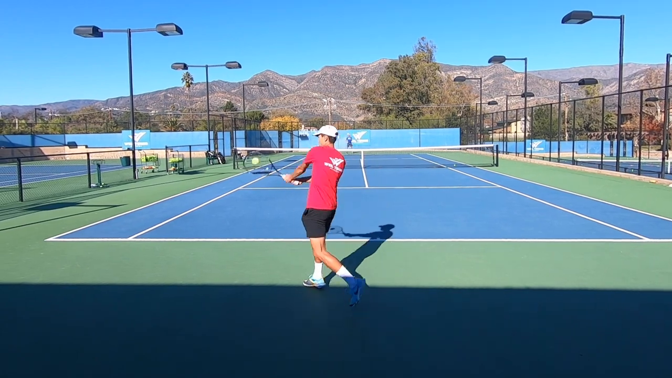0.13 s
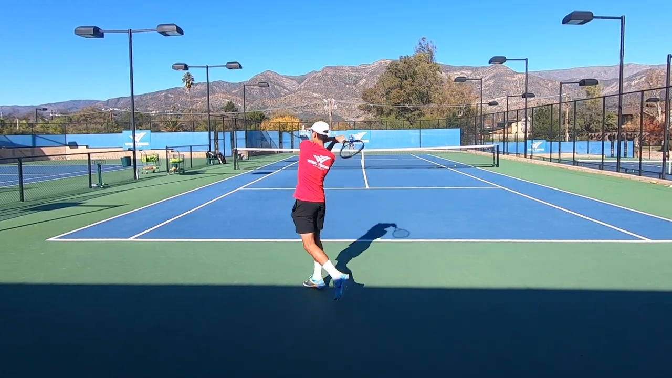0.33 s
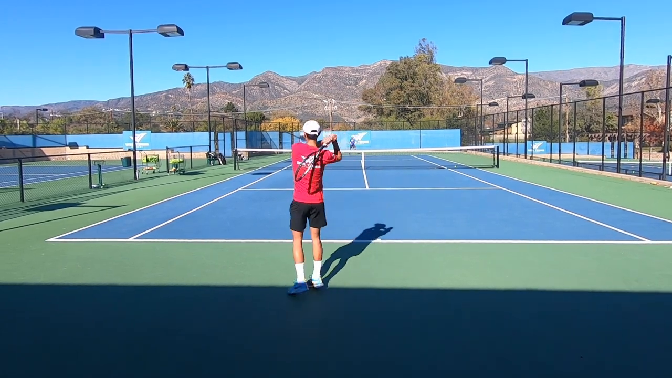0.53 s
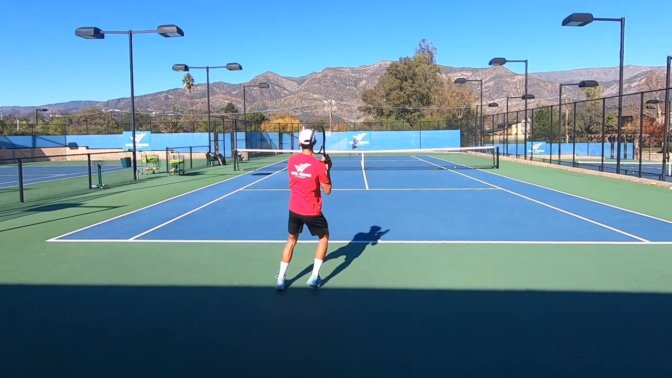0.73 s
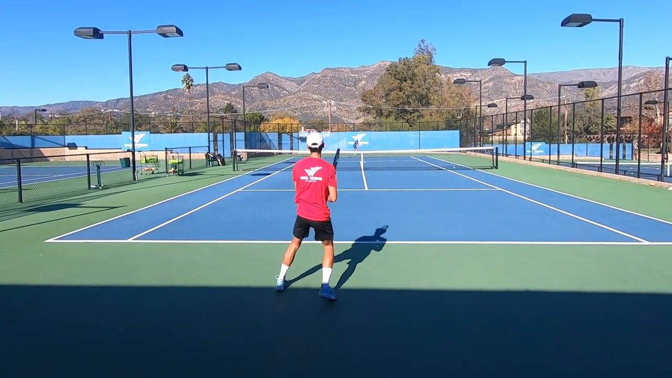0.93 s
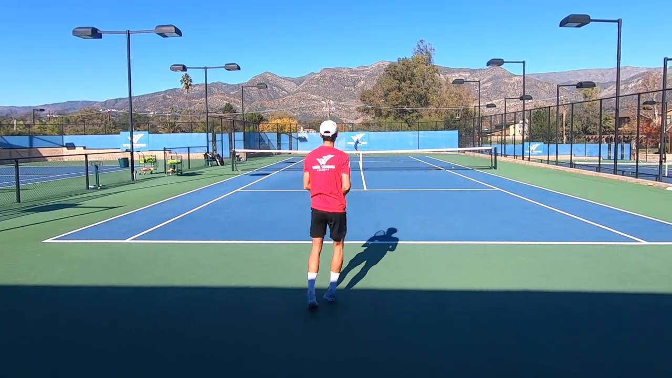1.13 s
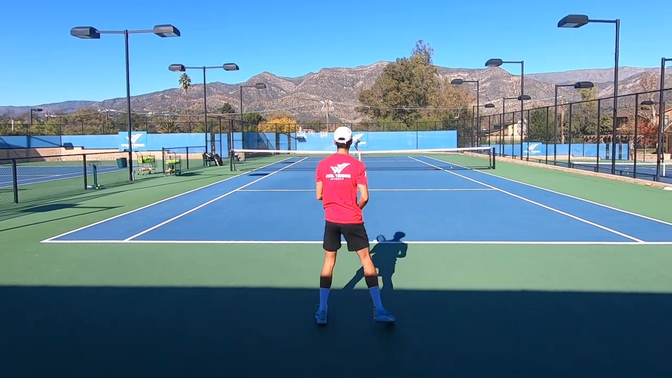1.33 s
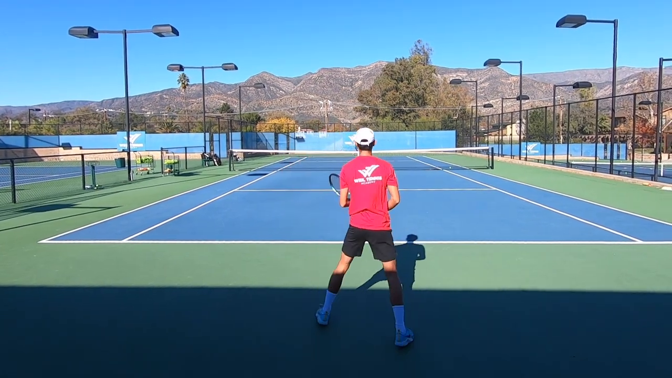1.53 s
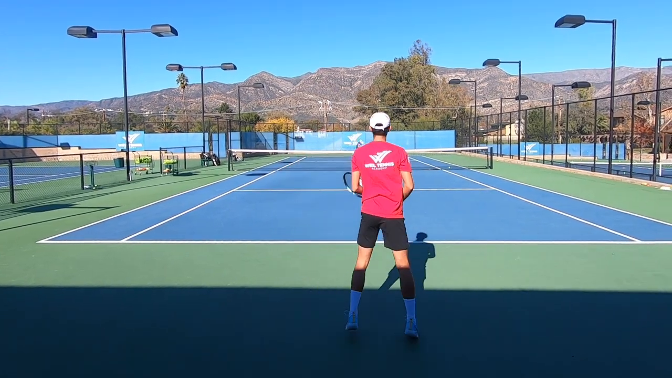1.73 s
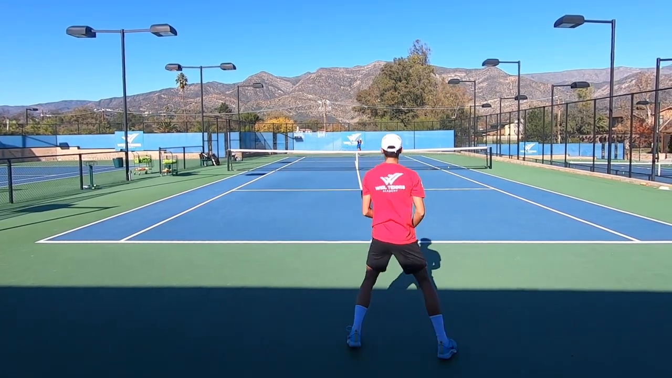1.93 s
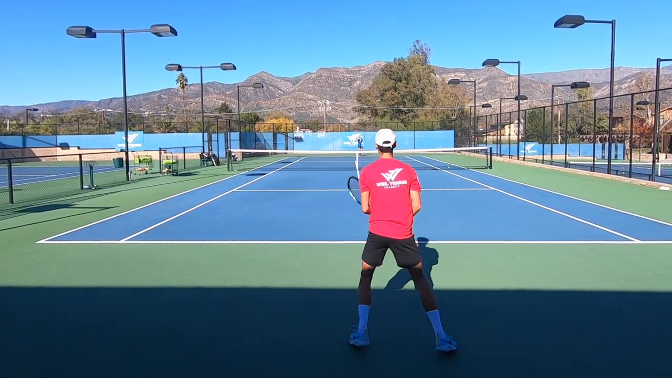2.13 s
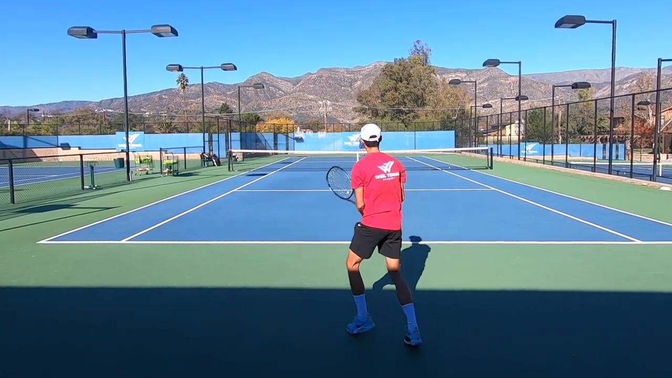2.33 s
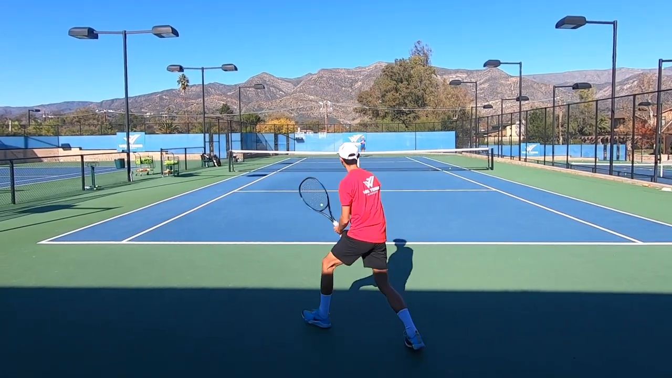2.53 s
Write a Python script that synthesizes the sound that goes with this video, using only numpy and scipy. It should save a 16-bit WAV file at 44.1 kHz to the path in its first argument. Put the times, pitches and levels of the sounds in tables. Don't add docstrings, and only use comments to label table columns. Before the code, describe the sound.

Tennis racket hits: a loud close pop, shoe scuffs, a distant answering pop, a near ball bounce

```python
import sys
import numpy as np
from scipy import signal
from scipy.fft import rfft, irfft, next_fast_len
from scipy.io import wavfile
from scipy.ndimage import uniform_filter1d

SR = 44100
rng = np.random.default_rng(int(sys.argv[2]) if len(sys.argv) > 2 else 0)


def file_out(sig):
    cols = np.atleast_2d(sig).T
    lim = np.clip(cols, -1, 1)
    pcm = np.round(lim * 32767).astype(np.int16)
    wavfile.write(sys.argv[1], SR, pcm)


def boost_factor(decibels):
    exponent = np.asarray(decibels, float) / 20
    return 10 ** exponent


N = 114660

# [t/s, first line level/dB, second line level/dB]
HUM_SWELL = [(0, -42, -44.5), (.12, -45, -49.5), (.3, -51, -62), (.6, -50.5, -51.5), (.87, -46, -61),
             (1.05, -58, -51), (1.3, -52.5, -58.5), (1.45, -42.5, -54.5), (1.72, -41.5, -53),
             (1.899, -46, -48.5), (2.08, -57.5, -63.5), (2.3, -41, -49), (2.6, -48.5, -53.5)]
# [f/Hz, density/dB]
TOWN_SPECTRUM = [(25, 5), (50, 0), (100, -6), (300, -17), (500, -25), (1500, -24), (4000, -42),
                 (13000, -73)]
# [t/s, level/dB]
TRAFFIC_SWELL = [
    (0, 2.5),
    (.5, 1.5),
    (.85, -2),
    (1.15, 0.5),
    (1.45, -0.5),
    (1.75, -1),
    (2.1, 1),
    (2.6, 0.5),
]
# [f/Hz, share/0-1]
TOWN_LIKENESS = [(60, 0.77), (300, 0.93), (640, 0.6), (1400, 0), (8000, 0.9)]
# [t/s, level/dB, pan/dB, t60/s, centre f/Hz]
BRIGHT_CRACKS = [(.2268, -29, 4.5, 0.041, 3900), (.2262, -27, -2.5, 0.025, 7600), (0.2, -38, 1, 0.022, 14500),
                 (.2265, -29, 0, 0.042, 2960), (.3716, -53, -1, 0.024, 7100), (.4120, -55, 18, 0.065, 1300),
                 (.4230, -32.5, 6, 0.11, 970), (0.78, -57.5, -5, 0.045, 2700), (0.29, -54.5, 2, 0.026, 2900),
                 (0.017, -45.5, -1, 0.024, 1470), (1.3, -41, -7, 0.022, 1020), (1.8565, -54, 1, 0.02, 5700),
                 (1.8595, -40.5, -3, 0.025, 2700), (2.4, -41, 0, 0.09, 980), (1.8590, -35, -3, 0.018, 2400),
                 (1.8645, -33, 1, .015, 2000), (1.8985, -44, -2, 0.018, 2600), (1.9035, -41, -1, .015, 1950),
                 (1.8740, -49.5, -5, 0.13, 2900), (1.9515, -43.5, -2, 0.061, 3250),
                 (2.5950, -43.5, -8, 0.046, 2320)]
# [t/s, level/dB, pan/dB, contact/ms]
BALL_BOUNCES = [
    (.022, -31.5, -6, 0.9),
    (2.5950, -14.5, -17, 2.26),
]
# [f/Hz, level/dB, t60/s]
BALL_MODES = [(254, -4.5, 0.067), (430, -2, 0.02), (779, 5, 0.024), (1260, 4, 0.022)]
# [t/s, level/dB, pan/dB, t60/s, centre f/Hz]
GRIT_TICKS = [(.0423, -62.5, -1.5, 0.025, 7040), (.0667, -61, -3, 0.014, 6000),
              (.158, -59, -0.5, .02, 7000), (.5906, -66, -4, 0.018, 6000), (.621, -62, -6, 0.018, 6500),
              (.753, -58, -4, .015, 5500), (1.1892, -45, -2, .01, 5800), (1.212, -43, -4, 0.0092, 6200),
              (1.2795, -42, -7, .012, 6100), (1.7823, -61, -3, .02, 7000), (1.8043, -61.5, -3, 0.025, 7500),
              (2.178, -70, -7, .02, 7000), (2.200, -63, -2, .02, 6500), (2.2388, -62.5, -3, 0.032, 7000),
              (2.2677, -59, -1, .03, 7050), (2.282, -62, -2, 0.022, 8000), (2.300, -64, -2.5, .02, 8000),
              (2.412, -68, -4, .015, 8000), (2.4259, -61, -3.5, 0.018, 8000),
              (2.4409, -55, -4, 0.022, 6840)]
# [start t/s, swell/s, release/s, level/dB, centre f/Hz]
SWISH_EVENTS = [
    (.100, 0.036, 0.023, -59.5, 3960),
    (.170, 0.067, .005, -43.5, 4340),
    (.560, .13, .01, -60.5, 6000),
    (.6, .09, .01, -58.5, 2800),
    (2.150, 0.12, 0.058, -61.5, 4400),
    (.105, 0.034, 0.038, -61.5, 7500),
    (2.17, 0.088, 0.076, -67.5, 8000),
]
# [start t/s, length/s, from f/Hz, to f/Hz, level/dB]
STRING_WHISTLES = [
    (0.188, .022, 7600, 8700, -58),
    (0.196, .03, 4500, 5800, -58),
]
# [start t/s, hold/s, release/s, level/dB, centre f/Hz]
SCUFF_EVENTS = [(.705, .035, .015, -58, 9700), (.952, 0.012, 0.016, -68, 8400), (1.19, .03, .02, -65, 9500),
                (1.255, .038, 0.0098, -52, 9500), (1.488, 0.028, 0.027, -53, 8200),
                (2.35, 0.02, .01, -64, 8800), (0.247, 0.088, 0.053, -60.5, 4260),
                (.692, 0.044, 0.011, -43.5, 6000), (.697, 0.02, 0.052, -44, 2800),
                (0.731, 0.049, 0.099, -65, 5500), (0.953, 0.0096, 0.017, -51, 6000),
                (1.084, 0.0013, 0.0081, -52, 4700), (1.183, 0.04, 0.022, -52.5, 5630),
                (1.186, 0.072, 0.024, -53.5, 700), (1.185, .105, 0.017, -58.5, 2100),
                (1.487, 0.043, 0.049, -56, 1730), (.953, 0.012, .015, -57.5, 2500),
                (.214, 0.013, .004, -38.5, 605), (1.236, 0.041, .01, -51, 6000),
                (1.285, 0.0059, 0.0099, -47.5, 4100), (1.307, 0.095, 0.091, -70, 3960),
                (1.484, 0.023, 0.051, -57, 4200), (2.352, 0.0091, .006, -57, 4940),
                (2.367, 0.0068, 0.013, -45.5, 4150)]
# [t/s, level/dB, pan/dB, contact/ms]
NEAR_POPS = [(.2262, -18, 0, 0.63), (.2278, -9, -5, 0.68), (.2315, -23, -7, 0.27), (.280, -48, -12, 1),
             (.373, -31.5, 10, 0.67), (.377, -41, 2, .4), (.4140, -40, 6, 0.61), (.4245, -42, 0, 0.38),
             (.4262, -35, 5.5, 0.36), (.4315, -40.5, -5, 0.33), (.440, -41.5, 2, 0.37)]
# [f/Hz, level/dB, t60/s]
NEAR_MODES = [(91.4, -11, 0.059), (303, 10.5, 0.017), (520, -2.5, 0.023), (755, 4, 0.031), (1065, 3, 0.03),
              (1481, -1, 0.047), (1745, -6.5, .02), (2014, -5, 0.038), (2506, 0, 0.023), (2880, -3.5, 0.02),
              (3215, -9.5, .02), (3860, -14.5, .02)]
# [centre f/Hz, width/Hz, near pop level/dB, far pop level/dB, t60/s]
TAIL_BANDS = [(283, 420, -44, -46.5, 0.81), (566, 230, -51.5, -59.5, 1.4), (836, 260, -48, -46.5, 1.44),
              (1055, 240, -47, -37.5, 1.26), (1576, 340, -44.5, -49.5, 0.7), (2800, 1500, -55.5, -57, 0.84),
              (7500, 5500, -64, -68, 0.62)]
# [t/s, level/dB, pan/dB, contact/ms]
STEP_LANDINGS = [
    (.6910, -33.5, -9, 0.57),
    (1.0845, -30.5, -6.5, 0.4),
    (1.4850, -28, -11, 0.89),
    (2.4780, -38, 5, 0.54),
]
# [f/Hz, level/dB, t60/s]
SOLE_MODES = [(218, -8, 0.056), (633, -10, 0.014), (964, -5.5, 0.015), (1365, -8, 0.021),
              (2050, -3, 0.0081)]
# [t/s, level/dB, pan/dB, contact/ms]
FAR_POPS = [
    (1.8563, -41, 9, 0.57),
    (1.8575, -12.5, -2.5, 0.33),
    (1.8634, -18, -12.5, 0.38),
    (1.8749, -23.5, -12, 0.66),
    (1.8850, -31.5, -30, 0.17),
    (1.8940, -20.5, 1, 0.87),
    (1.904, -33, 7, 0.2),
    (1.9570, -24, 18.5, 0.3),
    (1.9593, -19, 2, 0.59),
    (2.089, -37.5, -6, 0.48),
]
# [f/Hz, level/dB, t60/s]
FAR_MODES = [(211, -8, 0.039), (390, -9, 0.024), (551, -13.5, 0.055), (783, -6.5, 0.037), (906, -4, 0.026),
             (1112, 6, 0.019), (1273, -11, 0.066), (1970, -12, 0.013), (2500, -13.5, 0.014),
             (3180, -47, .01)]

HUM_HZ, HUM2_HZ, HUM_WANDER, HUM_FLICKER_DB = 59.8, 118.1, .025, 1.8
TOWN_DB, TOWN_DRIFT_DB = -46, .9
RISE_S, MODE_VARY_DB, MODE_DETUNE = 0.0006, 1.5, .012
SCUFF_ATTACK_S, SCUFF_PAN_DB, SCUFF_TRIM_DB, CATCH_DB = 0.00067, -4, -4, 2.2
GRIT_PER_S, GRIT_SPREAD_DB, GRIT_WIDTH = 6600, 1.5, .6
GRIT_AIR_DB, GRIT_AIR_HZ, AIR_PAN_DB = -15, 11040, -0.5
TAIL_RISE_S, TAIL_LUMP_DB = 0.0018, 1.9
PORT_HZ, PORT_LAG_S = 500, 2e-5
MIC_LOW_HZ, MIC_TOP_HZ, TOP_HZ, HEADROOM = 72.6, 11700, 15800, .75
PRESENCE_HZ, PRESENCE_WIDTH_HZ, PRESENCE_DB = 6000, 420, -18


def unit(x):
    return x / np.sqrt(np.mean(x ** 2))


def band(x, hz, width):
    return signal.lfilter(*signal.iirpeak(hz, max(hz / width, .2), fs=SR), x)


def walk(rate, count):
    k = int(SR / rate)
    held = np.repeat(rng.standard_normal(N // 50), k)[:count]
    return 1.85 * uniform_filter1d(uniform_filter1d(held, k), k)


def add(out, at_s, sound, pan_db):
    size = next_fast_len(len(sound) + 64)
    hz = np.arange(size // 2 + 1) * SR / size
    start = int(at_s * SR)
    half = np.array([[.5], [-.5]]) * pan_db
    late = (at_s * SR - start + 8) / SR + half / 2 * PORT_LAG_S
    level = boost_factor(half * hz ** 2 / (hz ** 2 + PORT_HZ ** 2))
    pair = irfft(rfft(sound, size) * level * np.exp(-2j * np.pi * hz * late), size)
    out[:, start - 8:start - 8 + size] += pair[:, :N - start + 8]


def hum():
    times, first_db, second_db = np.array(HUM_SWELL).T
    out, t = 0, np.arange(N) / SR
    for hz, db in ((HUM_HZ, first_db), (HUM2_HZ, second_db)):
        level = boost_factor(np.interp(t, times, db) + HUM_FLICKER_DB * walk(18, count=N))
        pitch = hz * (1 + HUM_WANDER * walk(11.0, count=N))
        out = out + np.sqrt(2) * level * np.sin(2 * np.pi * np.cumsum(pitch) / SR)
    return out


def town():
    out, f = 0, np.arange(N // 2 + 1) * SR / N + 1
    swell = np.interp(np.arange(N) / SR, *np.array(TRAFFIC_SWELL).T)
    floor_hz, floor_db = np.array(TOWN_SPECTRUM).T
    alike_hz, alike = np.array(TOWN_LIKENESS).T
    spectrum = boost_factor(np.interp(np.log(f), np.log(floor_hz), floor_db))
    for hz in 22 * 2 ** np.arange(0, 9.6, .5):
        bell = np.exp(-(np.log2(f / hz) * 3) ** 2) * spectrum
        mid, side = irfft(rfft(rng.standard_normal((2, N))) * bell, N)
        share = np.clip(np.interp(np.log(hz), np.log(alike_hz), alike), 0, 1)
        drift = TOWN_DRIFT_DB * walk(2.9, count=N) + 0.41 * walk(44, count=N)
        level = boost_factor(drift + swell * min(hz / 300., 1))
        pair = np.sqrt(1 + share) * mid + np.sqrt(1 - share) * side * np.array([[1], [-1]])
        out = out + level * pair
    return boost_factor(TOWN_DB) * unit(out)


def cracks(rows):
    out, t = np.zeros((2, N)), np.arange(SR // 8) / SR
    for at, db, pan, t60, hz in rows:
        burst = unit(band(band(rng.standard_normal(len(t)), hz, 0.33 * hz), hz, 1.47 * hz))
        fade = np.minimum(t / 0.0011, 1) * 1000. ** (-t / t60)
        add(out, at, boost_factor(db) * burst * fade, pan)
    return out


def blows(rows, modes):
    out, t = np.zeros((2, N)), np.arange(SR // 8) / SR
    chance = rng.standard_normal((len(rows), 2, 14))
    for (at, db, pan, ms), (detune, vary) in zip(rows, chance):
        ring = 0
        for k, (f, mode_db, t60) in enumerate(modes):
            level = (-1) ** k * boost_factor(mode_db + MODE_VARY_DB * vary[k])
            hz = f * (1 + MODE_DETUNE * detune[k])
            ring = ring + level * np.sin(2 * np.pi * hz * t) * 1000. ** (-t / t60)
        span = max(ms, .1) * SR / 1000
        push = np.sin(np.pi * np.minimum(np.arange(int(span) + 2) / span, 1))
        struck = np.convolve(ring * (1 - np.exp(-t / RISE_S)), push / push.sum())
        add(out, at, boost_factor(db) * struck, pan)
    return out


def rush(rows, swell):
    out, t = np.zeros((2, N)), np.arange(SR // 4) / SR
    for at, hold, release, db, hz in rows:
        pick, size, sign = rng.random((3, len(t)))
        click = (2 * sign - 1) * boost_factor(-GRIT_SPREAD_DB * np.log(size + 0.0013))
        grit = (pick < GRIT_PER_S / SR) * click
        rise = np.minimum(t / (hold if swell else SCUFF_ATTACK_S), 1)
        shape = rise * np.exp(-np.maximum(t - hold, 0) / release * 2)
        shape = shape * boost_factor(db + SCUFF_TRIM_DB + CATCH_DB * walk(99, count=len(t)))
        body = unit(band(band(grit, hz, GRIT_WIDTH * hz), hz, 2 * GRIT_WIDTH * hz))
        fizz = unit(band(grit[::-1], GRIT_AIR_HZ, 9900))
        air = boost_factor(GRIT_AIR_DB) * fizz * min(hz / 3700.0, 1) ** 2
        add(out, at, shape * body, SCUFF_PAN_DB)
        add(out, at, shape * air, AIR_PAN_DB)
    return out


def swishes():
    return rush(SWISH_EVENTS, True)


def whistles():
    out = np.zeros((2, N))
    for at, length, from_hz, to_hz, db in STRING_WHISTLES:
        share = np.arange(int(length * SR)) / (length * SR)
        hz = (from_hz + (to_hz - from_hz) * share) * (1 + .02 * walk(900, count=len(share)))
        level = boost_factor(db + 3.0 * walk(400, count=len(share))) * np.sqrt(np.sin(np.pi * share))
        add(out, at, level * np.sin(2 * np.pi * np.cumsum(hz) / SR), SCUFF_PAN_DB)
    return out


def scuffs():
    return rush(SCUFF_EVENTS, False)


def tail(at_s, column):
    out, t = 0, np.maximum(np.arange(N) / SR - at_s, 0)
    for row in TAIL_BANDS:
        hz, width, t60 = row[0], row[1], row[4]
        mid, side = (unit(band(band(rng.standard_normal(N), hz, width), hz, width)) for _ in range(2))
        lumps = boost_factor(row[column] + TAIL_LUMP_DB * walk(44, count=N)) * 1000. ** (-t / t60)
        out = out + lumps * (mid + min(hz / 1100.0, 1) * side * np.array([[1], [-1]]))
    return out * np.minimum(t / TAIL_RISE_S, 1) ** 2


def scene():
    hits = blows(NEAR_POPS, NEAR_MODES) + blows(FAR_POPS, FAR_MODES) + cracks(BRIGHT_CRACKS) + whistles()
    echoes = tail(NEAR_POPS[0][0], 2) + tail(FAR_POPS[0][0], 3)
    ball = blows(BALL_BOUNCES, BALL_MODES)
    feet = blows(STEP_LANDINGS, SOLE_MODES) + cracks(GRIT_TICKS) + scuffs()
    low_cut = signal.butter(2, MIC_LOW_HZ, "high", fs=SR, output="sos")
    near = signal.sosfilt(low_cut, hits + ball + feet + swishes())
    return near + echoes + hum() + town()


def low_pass(x):
    return signal.sosfilt(signal.butter(12, 16150, fs=SR, output="sos"), x)


def record(dry):
    lifted = dry + boost_factor(PRESENCE_DB) * band(dry, PRESENCE_HZ, PRESENCE_WIDTH_HZ)
    x = np.tanh(lifted / HEADROOM) * HEADROOM
    x = signal.sosfilt(signal.butter(4, MIC_TOP_HZ, fs=SR, output="sos"), x)
    x = signal.sosfilt(signal.ellip(8, .2, 70, TOP_HZ, fs=SR, output="sos"), x)
    return low_pass(x)


dry = scene()
out = record(dry)
file_out(out)
```